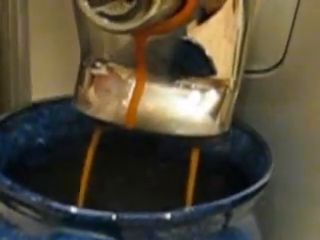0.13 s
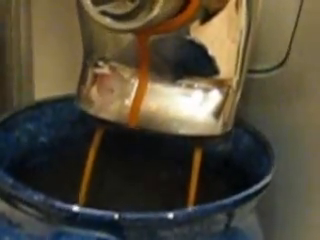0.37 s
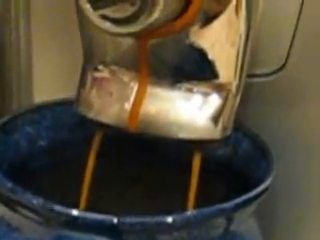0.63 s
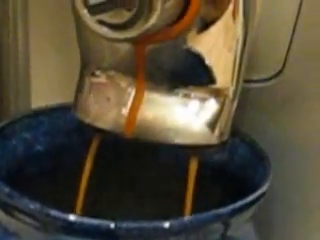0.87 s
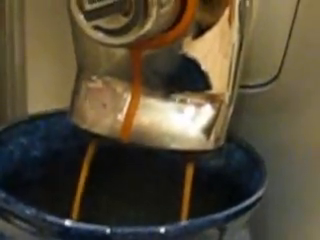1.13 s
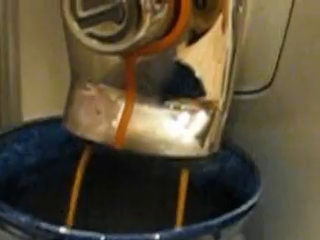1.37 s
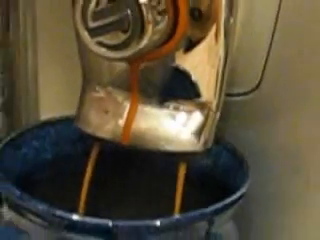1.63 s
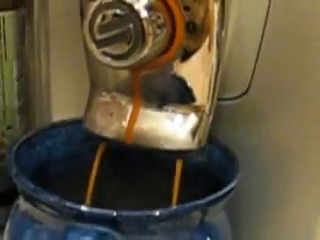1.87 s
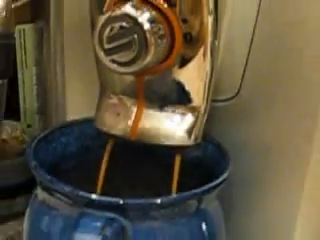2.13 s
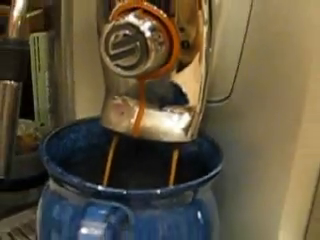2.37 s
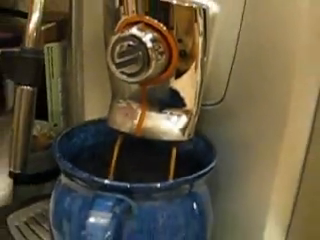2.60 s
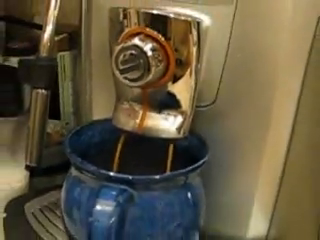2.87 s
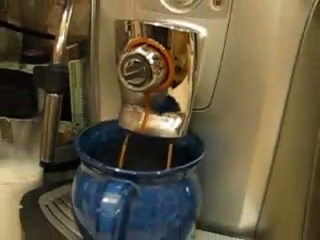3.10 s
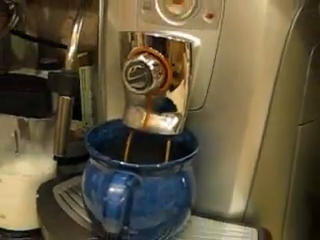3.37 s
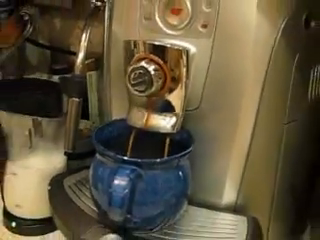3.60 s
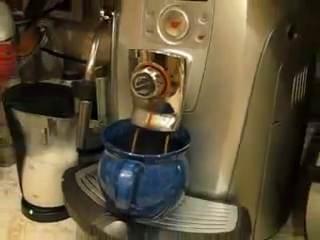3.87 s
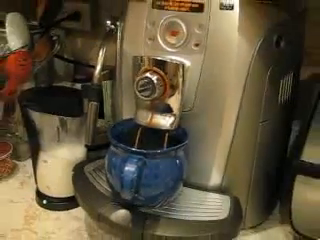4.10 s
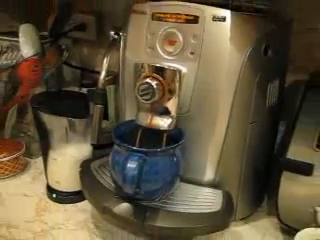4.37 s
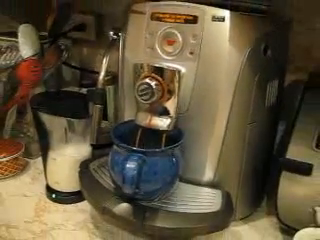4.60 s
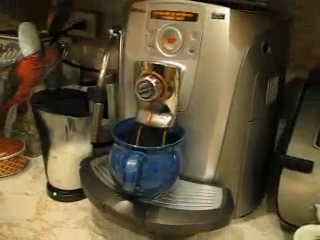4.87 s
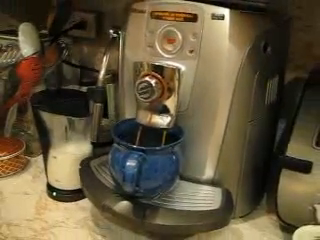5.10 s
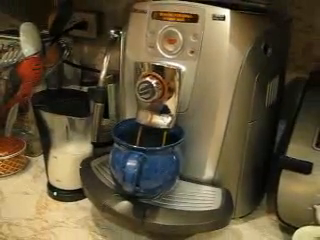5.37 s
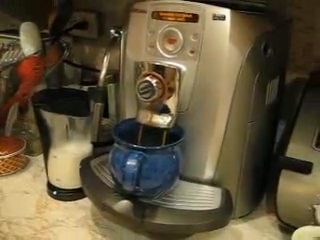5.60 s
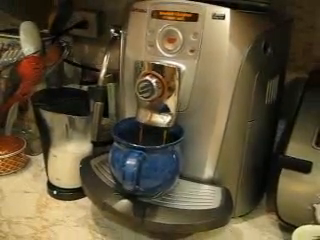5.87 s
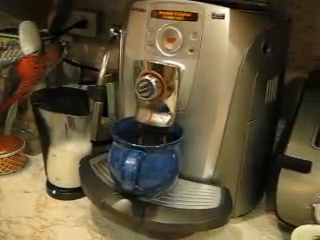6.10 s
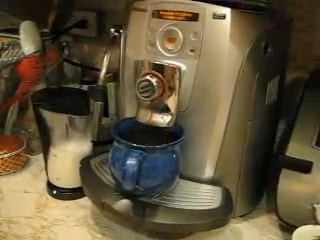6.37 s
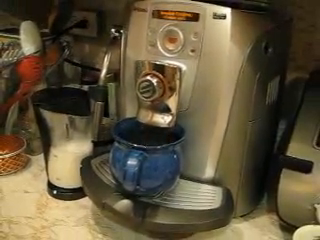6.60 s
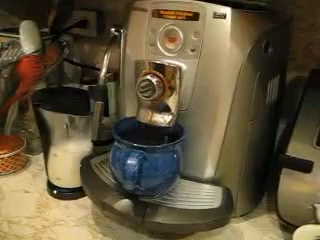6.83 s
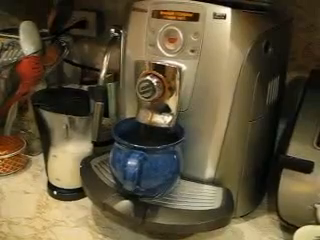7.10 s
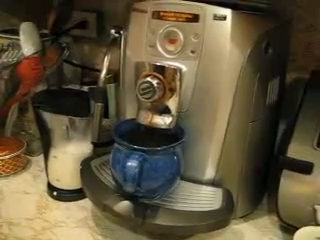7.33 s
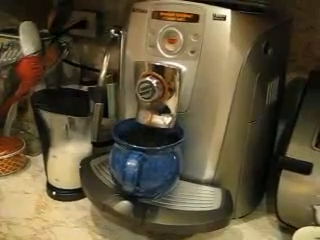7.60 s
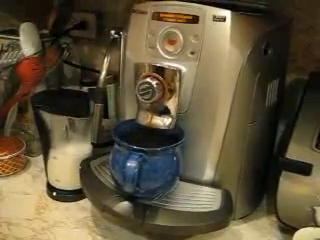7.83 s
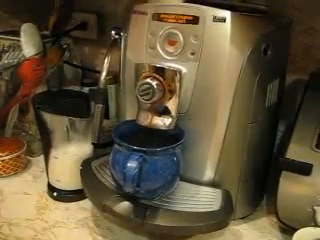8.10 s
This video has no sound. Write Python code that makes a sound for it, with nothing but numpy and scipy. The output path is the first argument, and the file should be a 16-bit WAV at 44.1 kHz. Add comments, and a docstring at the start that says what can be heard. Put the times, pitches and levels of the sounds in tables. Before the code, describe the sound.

Harsh steady mains-rate pump buzz and jittery crockery clinks stop abruptly, leaving faint hiss and whine, then two hard mechanical clunks with short gear grinding.

```python
"""A coffee machine's pump buzzes at the mains rate, a stack of harmonics over noise that swells at each stroke.
It shakes cup and tray, whose clinks are short scrapes of noise ringing their modes; a kitchen hushes and whines.
The pump stops and the crockery settles. The brew mechanism clunks twice, rattles and grinds, as ringing noise.
A small camera that backs away, shifting the balance of the buzz, samples the sound coarsely and holds each
sample, which mirrors it into the treble."""
import sys
import numpy as np
from scipy import signal
from scipy.fft import rfft, irfft, next_fast_len
from scipy.io import wavfile
from scipy.ndimage import uniform_filter1d, map_coordinates

SR = 44100
rng = np.random.default_rng(int(sys.argv[2]) if len(sys.argv) > 2 else 0)


def master_out(mix):
    """Clip the mix to full scale and print it as 16-bit PCM to the path in sys.argv[1]."""
    frames = np.transpose(np.atleast_2d(mix))
    ceiling = np.clip(frames, -1, 1)
    pcm = np.round(ceiling * 32767).astype(np.int16)
    wavfile.write(sys.argv[1], SR, pcm)


def invert_db(x):
    """Field ratio 10**(x/20) for x, a level in decibels (scalar or array-like)."""
    u = np.asarray(x, float) / 20
    return 10 ** u


N = 362502
STOP_S = 5.213  # the pump cuts off


def unit(x):
    """Scales to rms 1."""
    return x / np.sqrt(np.mean(x ** 2) + 1e-20)


def along(points, hz):
    """Reads (frequency_hz, value) points on a log frequency axis."""
    f, v = np.transpose(points)
    return np.interp(np.log(hz + 1), np.log(f + 1), v)


def wobble(knots_per_s):
    """A smooth random curve through normally distributed knots."""
    knots = rng.standard_normal(int(N / SR * knots_per_s) + 4)
    return map_coordinates(knots, [np.arange(N) * knots_per_s / SR])


def filtered(x, response):
    """Multiplies the spectrum of x by a complex response of frequency."""
    m = next_fast_len(len(x) + 8192)
    return irfft(rfft(x, m) * response(np.fft.rfftfreq(m, 1 / SR)), m)[:len(x)]


def hiss(spectrum):
    """Noise of rms 1 with the given colour."""
    return unit(filtered(rng.standard_normal(N), lambda hz: invert_db(along(spectrum, hz))))


def resonance(f, centre_hz, width_hz):
    """The response of one causal resonance."""
    return 1j * f * width_hz / (centre_hz ** 2 - f * f + 1j * f * width_hz)


def resonances(modes, favoured_hz, breadth):
    """The modes of a body, heard through the band that the contact favours."""
    def response(f):
        band = resonance(f, favoured_hz, favoured_hz * max(breadth, .05)) ** 2
        body = sum((-1) ** k * invert_db(db) * resonance(f, centre_hz, width_hz)
                   for k, (centre_hz, width_hz, db) in enumerate(modes))
        return band * body
    return response


def peak_one(x):
    """Scales to peak 1."""
    return x / np.abs(x).max()


def struck(events, modes, rise_s):
    """Each contact is a short scrape of noise that rings the modes and is also heard bare, as a crack."""
    out = np.zeros(N + SR)
    t = np.arange(SR // 5) / SR
    for start_s, level_db, pitch_hz, length_s, breadth, crack_db in events:
        contact = np.exp(-(t / length_s) ** 2 / 2) * (1 - np.exp(-t / rise_s))  # holds briefly, then lets go
        scrape = contact * rng.standard_normal(len(t))
        scrape[round(rise_s * SR)] += 12  # the first touch is one sharp tap
        crack = filtered(scrape, lambda f: resonance(f, 2900, 3700))
        ring = filtered(scrape, resonances(modes, pitch_hz, breadth))
        sound = peak_one(ring) + invert_db(crack_db) * peak_one(crack)
        out[round(start_s * SR):][:len(t)] += invert_db(level_db) * sound
    return out[:N]


# The pump's lower harmonics, before their waver:
# multiple_of_mains, near_db (rms, close by), far_db (rms, farther off)
HARMONICS = [(1, -54, -52), (2, -43, -42), (3, -48, -47), (4, -35, -32), (5, -34, -33), (6, -36, -37),
             (7, -32, -33), (8, -32, -26), (9, -39, -35), (10, -32, -28), (11, -29, -31), (12, -22, -24.5),
             (13, -30, -32), (14, -29, -29), (15, -44, -44), (16, -33, -35), (17, -31, -32), (18, -41, -37),
             (19, -48, -50), (20, -41, -44), (21, -41, -39), (22, -46, -44), (23, -43, -40), (24, -50, -45),
             (25, -48, -42), (26, -49, -43)]
# Colour of the loose case parts and flowing water between the harmonics: frequency_hz, relative_db (per Hz)
SHAKE_COLOUR = [(20, -32), (55, -25), (95, -22), (200, -1), (270, -11.5), (440, 1.5), (510, -9),
                (600, -6.5), (850, 2.5), (930, -5), (990, -5.5), (1060, -4.5), (1230, -12), (1500, -7.5),
                (2000, -15), (2300, -10.5), (3200, -12.5), (4200, -17), (5500, -16.5), (8000, -69)]


def pump():
    """One piston stroke per mains cycle: a clean harmonic stack plus noise that swells at each stroke."""
    mains_hz, top_order = 59.985, 40
    upper_db, upper_spread_db = -53, 2.5  # rms of the higher harmonics
    back_from_s, back_to_s = 1.0, 3.63  # the camera backs away steadily
    buzz_t60_s, shake_t60_s = 0.084, 0.45  # the loose parts linger longer than the buzz
    clatter_db, shake_db = -50, -28

    t = np.arange(N) / SR
    away = np.clip((t - back_from_s) / (back_to_s - back_from_s), 0, 1)
    upper = [(k, *(upper_db + upper_spread_db * rng.standard_normal(2)))
             for k in range(len(HARMONICS) + 1, top_order + 1)]
    order, near_db, far_db = np.transpose(HARMONICS + upper)

    # a blow through a causal body: the phases follow from the log levels
    log_gain = np.log(invert_db(np.r_[far_db[0], (near_db + far_db) / 2, far_db[-1]]))
    lag = -np.imag(signal.hilbert(np.r_[log_gain, log_gain[-2:0:-1]]))[1:len(order) + 1]
    lag += 0.81 * rng.standard_normal(len(order))  # reflections scatter them

    cycle = 2 * np.pi * mains_hz * (t - .0035)
    buzz = np.zeros(N)
    for k, near, far, phase in zip(order, near_db, far_db, lag):
        # weak and high harmonics waver more
        waver_db = 0.021 * (far_db.max() + 4.0 - far) * np.sqrt(k) * wobble(3.37)
        gain = np.sqrt(2) * invert_db(near + (far - near) * away + waver_db)
        buzz -= gain * np.cos(k * cycle + phase + 0.058 * k * wobble(1.545))
    buzz *= invert_db(0.21 * wobble(40))  # strokes differ a little in strength

    # the valve clatters the same way every cycle, which draws faint harmonics far into the treble
    pattern = rng.standard_normal(round(SR / mains_hz))
    place = (cycle / (2 * np.pi) + .004 * wobble(1.5)) % 1
    clatter = pattern[(place * len(pattern)).astype(int) % len(pattern)]

    def above_stack(hz):
        return invert_db(along(SHAKE_COLOUR, hz)) * (hz > (len(order) + .5) * mains_hz) * (hz < SR / 8)
    buzz += invert_db(clatter_db) * unit(filtered(clatter, above_stack))

    stroke = invert_db(np.cos(cycle - .8) + 0.5 * np.cos(2 * cycle) + 0.92 * wobble(14))
    shaking = invert_db(shake_db) * unit(stroke * hiss(SHAKE_COLOUR))
    since_stop = np.maximum(t - STOP_S, 0)
    return invert_db(-60 * since_stop / buzz_t60_s) * buzz + invert_db(-60 * since_stop / shake_t60_s) * shaking


# Colour of the quiet room and microphone hiss: frequency_hz, relative_db (per Hz)
HUSH_COLOUR = [(20, -24), (40, -6), (60, -12), (110, -11.5), (410, -11.5), (1130, -14.5), (1630, -13),
               (2550, -14), (3350, -12.5), (3830, -14), (5500, -11.5), (8000, -97)]
# Steady electric whines: frequency_hz, level_db (rms before the waver), waver_db
ELECTRIC_WHINES = [(60, -61, 2.5), (1559, -67, 2), (1619, -63, 2), (1679, -66, 2), (3143, -65, 2),
                   (3404, -51, .5)]


def kitchen():
    """Room hush as coloured noise, and faint electric whines as sines of wavering level."""
    t = np.arange(N) / SR
    out = invert_db(-43.5 + 0.088 * wobble(1.1)) * hiss(HUSH_COLOUR)
    for hz, level_db, waver_db in ELECTRIC_WHINES:
        gain = np.sqrt(2) * invert_db(level_db + waver_db * wobble(6.2))
        out += gain * np.sin(2 * np.pi * (hz * t + rng.random()))
    return out


# Clinks of cup and tray: start_s, level_db (peak of the ring), pitch_hz (favoured), length_s (of the contact),
# breadth (favoured band's width over its pitch)
CUP_CLINKS = [(.172, -20, 2500, 0.0052, .6), (.405, -16, 2300, 0.0073, 0.46),
              (0.422, -19, 2310, .011, 0.33), (0.5, -15.5, 2440, 0.0067, 0.38),
              (0.72, -18, 2360, .006, 0.54), (.946, -18.5, 2930, .005, .3), (1.088, -22, 2130, .023, 0.35),
              (1.208, -16, 2730, .004, 0.23), (1.475, -21.5, 2290, .01, 0.38),
              (1.927, -20.5, 2100, .006, .5), (2.059, -19, 3300, .005, 0.7), (2.236, -20, 2310, .005, .45),
              (2.324, -26, 4640, .005, .4), (3.207, -23, 4000, .007, .8), (3.248, -20, 2600, .005, .5),
              (3.271, -19.5, 2850, 0.0054, .25), (3.35, -15, 2600, 0.0046, .35),
              (3.433, -21, 4520, 0.006, .8), (3.809, -16.5, 2430, .007, 0.29),
              (4.046, -22, 2580, .006, 0.58), (4.217, -23, 4500, .004, .8), (4.525, -23, 4000, 0.021, .5),
              (4.565, -15.5, 3880, 0.0086, 0.52), (4.608, -18, 2620, 0.011, 0.46),
              (4.916, -20, 3000, 0.0067, .4), (4.963, -10.5, 1990, 0.018, 0.96),
              (5.002, -23, 2580, .007, .8), (5.252, -24, 1300, 0.0092, .6), (5.32, -35, 1500, .005, .3),
              (5.326, -28, 2290, .019, .3), (5.407, -26, 2290, 0.018, 1), (5.431, -24, 1010, 0.016, 0.65),
              (5.464, -26, 2510, 0.01, 0.99), (5.506, -29, 2300, 0.03, 0.52), (5.537, -36, 1500, .007, .2),
              (5.566, -26, 1620, 0.014, 1), (5.642, -32, 2140, 0.024, .6), (5.691, -28, 520, 0.0094, 0.36),
              (5.721, -24.5, 2290, .012, .3), (5.722, -28.5, 1510, 0.01, 0.26),
              (5.766, -28, 1500, .005, 0.33), (5.795, -19.5, 2300, 0.01, 0.58),
              (5.934, -23, 2270, 0.0075, .4)]
# Modes of cup and tray: centre_hz, width_hz, level_db
CROCKERY_MODES = [(657, 200, -5), (1030, 660, 0), (1500, 30, 7.5), (1806, 200, -0.5), (2225, 29, 7),
                  (2290, 100, 5.5), (2500, 31, 6.5), (2895, 240, -2), (3300, 57, 4), (3720, 1500, 0),
                  (4740, 140, 5)]


def crockery():
    """Cup and tray clink while shaken and settle after the stop; many small clinks fall by chance."""
    count, typical_db, spread_db = 55, -26.5, 4  # chance clinks while the pump runs
    chance = [(STOP_S * a, typical_db + spread_db * (2 * b - 1), 1800 * 2 ** (1.23 * c), .004, .45)
              for a, b, c in rng.random((count, 3))]
    # harder contacts ring more modes and crack louder
    events = [(*clink, -21 + 19 * clink[-1]) for clink in CUP_CLINKS + chance]
    return struck(events, CROCKERY_MODES, rise_s=0.00038)


# How fast the room's answer dies: frequency_hz, t60_s
ROOM_DECAY = [(150, 0.42), (1000, 0.3), (5000, 0.04)]


def walls(x):
    """Each frequency of the room's answer dies at its own speed."""
    hz, t, z = signal.stft(rng.standard_normal(SR // 2), SR, nperseg=256)
    fade = invert_db(-60 * t / along(ROOM_DECAY, hz)[:, None])
    tail = signal.istft(z * fade, SR, nperseg=256)[1]
    delayed = np.pad(x, (300, 0))  # samples before the answer starts
    return signal.fftconvolve(delayed, tail / np.linalg.norm(tail))[:N]


# The brew unit latches: start_s, level_db (peak of the main ring), pitch_hz (favoured)
LATCH_CLUNKS = [(6.708, -5.5, 1320), (7.727, -6.5, 1500)]
# Parts of every clunk (lead-in tick, blow, low thud of the housing, scrape as it seats):
# after_s, under_db (relative to the blow), pitch_ratio, length_s, breadth (width over pitch), crack_db (over the ring)
LATCH_PARTS = [(-.006, -17.5, 0.77, 0.0056, 2.4, -5), (0, 0, 1, 0.0089, 2.1, -5),
               (.006, -19, .17, .01, 1.6, -18), (0.016, -21.5, .6, 0.021, 1.2, 16.5)]
# Rattles of the loose brew unit:
# start_s, level_db (peak of the ring), pitch_hz (favoured), length_s, crack_db (over the ring)
BREW_RATTLES = [(6.738, -16, 1080, 0.0042, -10), (6.787, -33, 1090, .006, -20),
                (6.812, -31, 1440, 0.011, -20), (6.83, -21, 1320, .006, -20),
                (6.849, -29, 1090, 0.0065, -20), (6.872, -24, 1100, .008, -20),
                (6.882, -18.5, 1400, 0.013, -15), (6.909, -26, 1560, .008, -20),
                (6.961, -17.5, 1300, 0.0054, -20), (7.001, -17.5, 1270, .016, -20),
                (7.018, -26, 3300, 0.022, -12), (7.027, -14, 1060, 0.0084, -15),
                (7.139, -26, 890, 0.0051, -20), (7.733, -16, 860, .004, -16), (7.8, -19.5, 930, 0.0068, 11)]
# Modes of the plastic housing: centre_hz, width_hz, level_db
HOUSING_MODES = [(75, 60, -12), (189, 77, 14.5), (356, 116, -1.5), (496, 40, -12), (860, 115, 0),
                 (1066, 40, -2), (1440, 73, -3), (1550, 40, 2.5), (1850, 180, -9.5), (2110, 100, -7.5),
                 (2680, 160, -5.5), (2890, 220, -3.5), (3550, 960, -7), (4900, 500, -2.5)]
# Gears turning inside, one list per spell: time_s, level_db (rms)
GRIND_LEVELS = [
    [(6.76, -40), (7.02, -36.5), (7.2, -51), (7.25, -66)],
    [(7.83, -37), (7.92, -43.5), (8.03, -38), (8.12, -36), (8.22, -36.5)],
]
# Tone of each spell: pitch_hz (favoured), breadth (width over pitch), lumps_db
GRIND_TONE = [(1060, 0.95, 3.5), (696, 1.3, 2)]


def mechanism():
    """Clunks and rattles ring the housing, over lumpy noise for the grind of the gears."""
    clunks = [(start_s + after_s, level_db + under_db, hz * ratio, *contact)
              for start_s, level_db, hz in LATCH_CLUNKS
              for after_s, under_db, ratio, *contact in LATCH_PARTS]
    rattles = [(*rattle, 0.37, crack_db) for *rattle, crack_db in BREW_RATTLES]  # 0.37 is the breadth
    out = struck(clunks + rattles, HOUSING_MODES, rise_s=0.0011)
    for rows, (hz, breadth, lumps_db) in zip(GRIND_LEVELS, GRIND_TONE):
        spell = [(rows[0][0] - .03, -90), *rows, (rows[-1][0] + .05, -90)]
        level_db = np.interp(np.arange(N) / SR, *np.transpose(spell))
        teeth = invert_db(lumps_db * wobble(60)) * rng.standard_normal(N)
        ringing = unit(filtered(teeth, resonances(HOUSING_MODES, hz, breadth)))
        # the gearbox itself is dull and broad
        rumble = unit(filtered(teeth, lambda f: resonance(f, hz, hz * breadth) ** 2))
        # the counter carries the grind's low end
        counter = unit(filtered(teeth, lambda f: resonance(f, 390, 390) ** 2))
        out += invert_db(level_db) * unit(0.2 * ringing + rumble + invert_db(-7.5) * counter)
    return out


def scene():
    """Pump, crockery and mechanism in the kitchen; the walls answer the struck and grinding sounds."""
    hits = crockery() + mechanism()
    echo = invert_db(-14) * walls(hits)
    return (pump() + hits + echo + kitchen())[None]


def band_limit(x):
    """A steep low-pass at the top of the band."""
    return signal.sosfilt(signal.butter(12, 21400, fs=SR, output="sos"), x)


# What survives of the mirrored treble: frequency_hz, gain_db
MIRROR_GAIN = [(8000, 0), (10500, 1), (11000, 16.5), (11200, -30), (11300, -90)]
# Colour of the hiss above the mirrored treble: frequency_hz, relative_db (per Hz)
TOP_HISS_COLOUR = [(11100, -88), (11200, 4), (11950, -5), (12050, -6.5), (14500, -18.5), (14700, -18),
                   (15650, -20), (15750, -90)]


def record(dry):
    """Every fourth sample is kept and held, so each tone gains a mirror image below a quarter of the rate.
    Above that only a hiss is left, which follows the loudness."""
    hold = 4  # samples
    hiss_db, floor_db = -32, -36.5  # hiss under the loudness, before its waver; loudness where it stops falling
    x = filtered(dry[0], lambda hz: 1 / (1 + (hz / 6000) ** 6))  # the input filter is gentle
    held = np.repeat(x[::hold], hold)[:N]
    mirrored = filtered(held, lambda hz: invert_db(along(MIRROR_GAIN, hz)))
    loudness = np.sqrt(np.abs(uniform_filter1d(x ** 2, SR // 30)) + invert_db(2 * floor_db))
    top = invert_db(hiss_db + wobble(5)) * loudness * hiss(TOP_HISS_COLOUR)
    mix = mirrored + top - .003  # small offset of the converter
    return band_limit(mix[None])


dry = scene()
out = record(dry)
master_out(out)
```